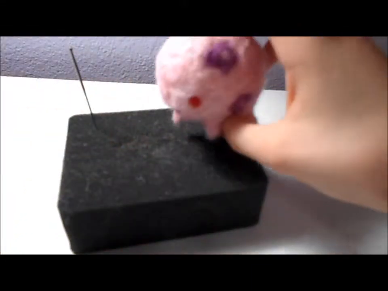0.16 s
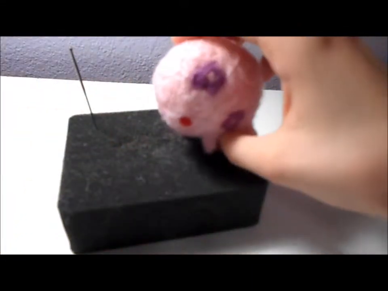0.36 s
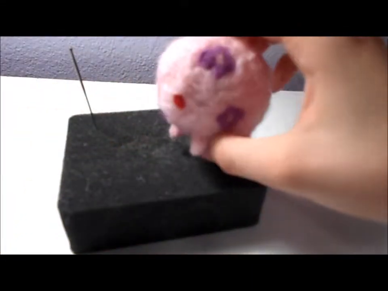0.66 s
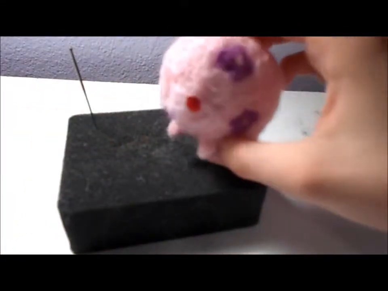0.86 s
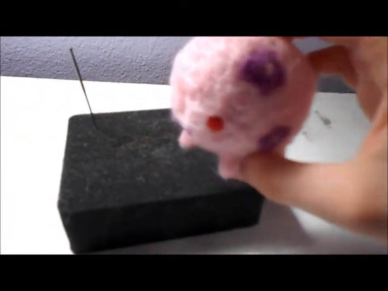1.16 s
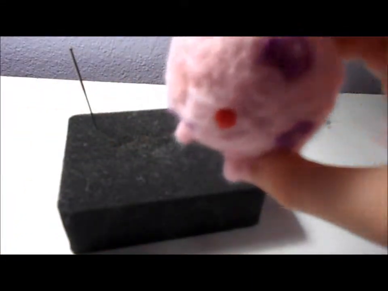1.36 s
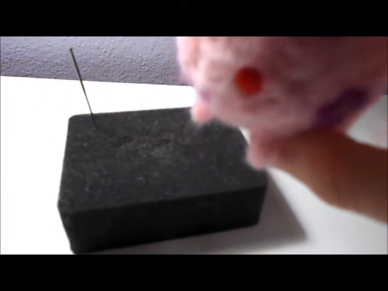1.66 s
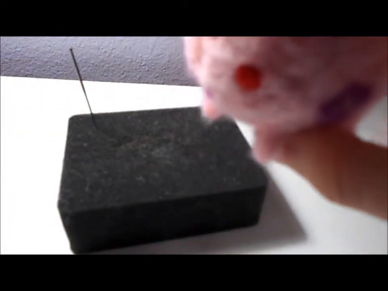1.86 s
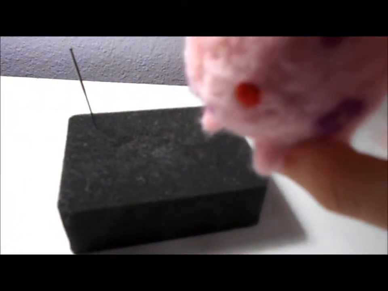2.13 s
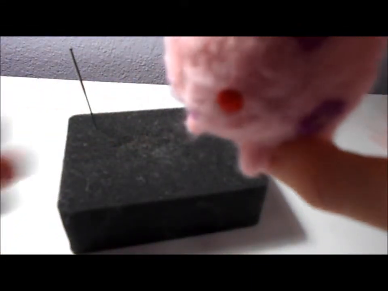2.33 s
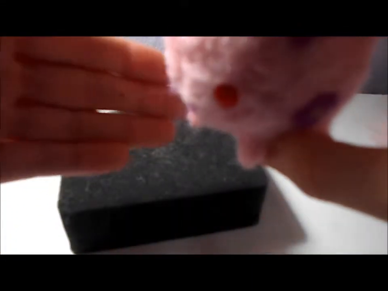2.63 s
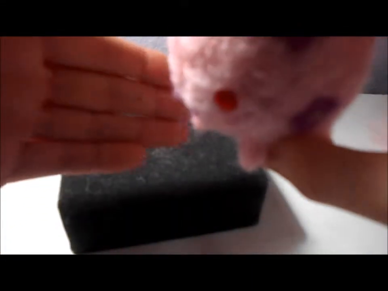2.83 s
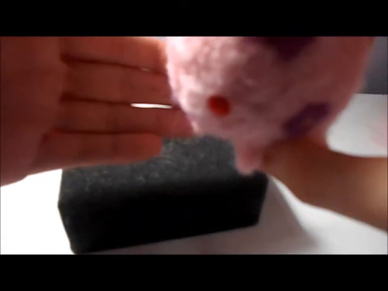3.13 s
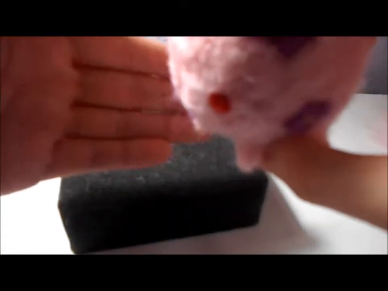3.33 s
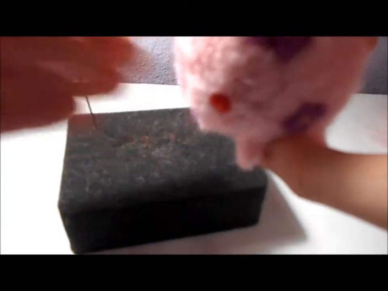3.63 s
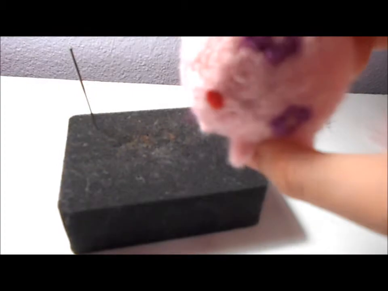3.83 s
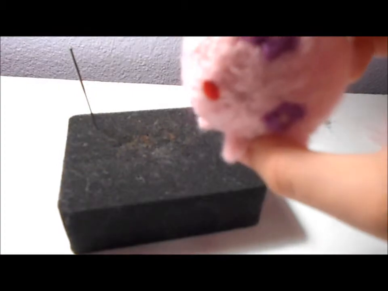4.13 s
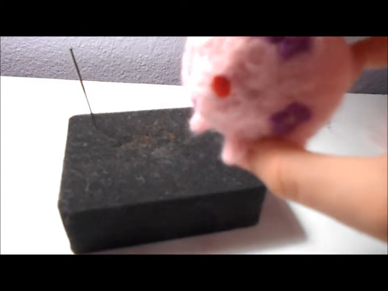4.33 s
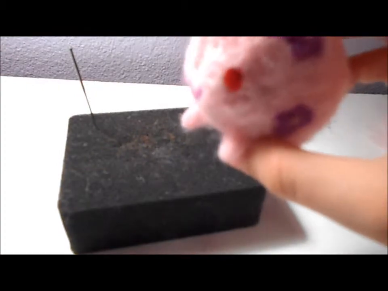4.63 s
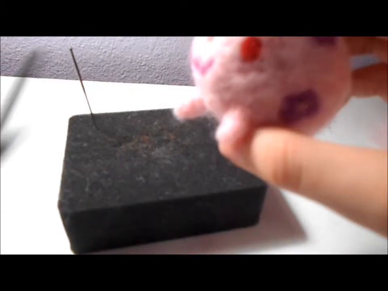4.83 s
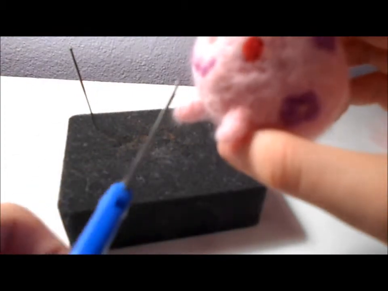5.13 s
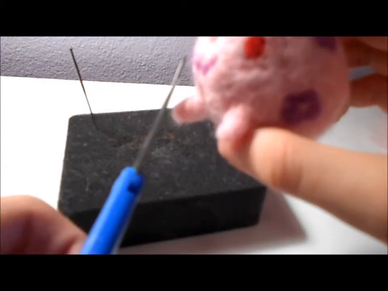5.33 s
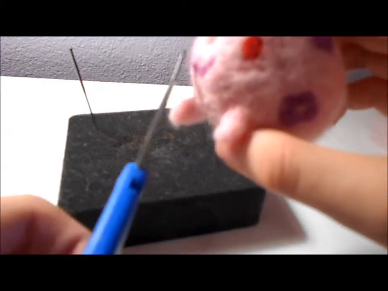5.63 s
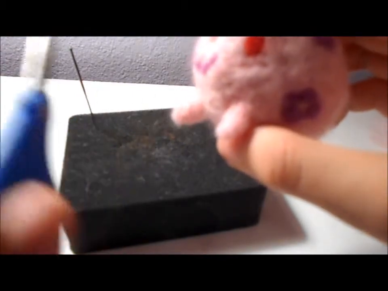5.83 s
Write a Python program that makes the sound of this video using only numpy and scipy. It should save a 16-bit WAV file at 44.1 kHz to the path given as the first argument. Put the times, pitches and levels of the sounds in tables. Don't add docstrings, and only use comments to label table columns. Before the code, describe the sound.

Small metal scissors bump and scrape on a hollow desk, drop with a sharp clatter, get picked up and snip twice over steady hiss.

```python
import sys
import numpy as np
from scipy import signal
from scipy.fft import rfft, irfft, next_fast_len
from scipy.io import wavfile
from scipy.ndimage import uniform_filter1d

SR = 44100
rng = np.random.default_rng(int(sys.argv[2]) if len(sys.argv) > 2 else 0)


def store_pcm(level_fs):
    pcm = np.round(np.clip(level_fs, -1, 1) * 32767).astype(np.int16)
    wavfile.write(sys.argv[1], SR, np.atleast_2d(pcm).T)


def volts(x):
    e = np.asarray(x, float) / 20
    return 10 ** e


N = 263718
BOARD_LOW_HZ = 178
WIDTH_TO_T60 = np.log(1000) / np.pi


def unit(x):
    return x / np.sqrt(np.mean(x ** 2))


def decay(t, t60):
    return np.exp(-np.log(1000) * t / t60)


def ring(hz, db, t60, size=8192):
    t = np.arange(size) / SR
    hz, db, t60 = (np.asarray(v)[:, None] for v in (hz, db, t60))
    return np.sum(volts(db) * decay(t, np.maximum(t60, .001)) * np.sin(2 * np.pi * hz * t), axis=0)


def conv(x, h):
    return signal.fftconvolve(x, h)[:len(x)]


def band(x, lo_hz, hi_hz, order=2):
    return signal.sosfilt(signal.butter(order, [lo_hz, hi_hz], "band", fs=SR, output="sos"), x)


def above(x, hz):
    return signal.sosfilt(signal.butter(4, hz, "high", fs=SR, output="sos"), x)


def gains(rows, roundness):
    out, t = np.zeros(N), np.arange(N) / SR
    for peak_s, rise_s, fall_s, db in rows:
        away = np.where(t < peak_s, (peak_s - t) / rise_s, (t - peak_s) / fall_s)
        stroke = volts(db - 20 * np.minimum(away, 3) ** roundness)
        out = np.maximum(out, stroke)
    return out


def grit(rate_hz, spread_db):
    hit = rng.random(N) < rate_hz / SR
    sign = rng.choice([-1., 1.], N)
    return hit * sign * volts(spread_db * rng.exponential(size=N))


def add(out, s, sound):
    i = int(s * SR)
    out[i:i + len(sound)] += sound[:N - i]


# f/Hz, t60/s, level touched at near edge/dB, level touched mid-board/dB
TABLE = [(190, 0.23, -13, -10.5), (316, 0.068, -7, -13), (338, 0.065, -15, 0.5), (391.7, 0.089, -17, -0.5),
         (461.6, 0.061, -11, -3.5), (545.6, 0.107, -7.5, -3.5), (670, 0.082, -12, -8.5),
         (958, 0.036, -6, -6), (1218, 0.1452, -21, -18.5), (1700, .04, -20, -14.5)]


def board(place, scatter_db=0.):
    hz, t60, *db = np.transpose(TABLE)
    return above(ring(hz, db[place] + scatter_db, t60), BOARD_LOW_HZ)


# f/Hz, level/dB, t60/s
SCISSORS = [(1090, -37, 0.05), (1270, 5.5, 0.073), (1653, -2.5, 1.5), (1980, -3, 0.041), (2309, -20, 0.04),
            (2530, -30, 0.065), (3228, -34, 0.041), (3480, -8, 0.023), (3817, -7.5, 0.11),
            (4330, -13, 0.043), (4700, -7, 0.019), (5230, -4.5, 0.034), (6040, -9.5, 0.018),
            (6400, -1, 0.039)]


def knock(place, rattle_s, peak_db, board_db, contact_hz, thud_hz):
    scatter_db, damped_t60_s, low_hz = 2.5, 0.0067, 600
    t = np.arange(1024) / SR
    chatter = (rng.random(len(t)) < .3) * rng.standard_normal(len(t))
    chatter[0] = 1.6
    chatter *= np.exp(-(t / rattle_s) ** 2)

    force = band(np.pad(chatter, (0, 7168)), contact_hz / 1.61, contact_hz * 1.17, order=1)
    force = above(force, low_hz)

    hz, db, t60 = np.transpose(SCISSORS)
    db = db + scatter_db * rng.standard_normal(len(hz))
    steel = conv(force, ring(hz, db, np.minimum(t60, damped_t60_s)))
    low_pass = signal.butter(2, min(2.3 * contact_hz, 9000), fs=SR)
    top = signal.lfilter(*low_pass, unit(steel) + 1.2 * unit(force))

    thud = above(ring([thud_hz], [4], [.045]), BOARD_LOW_HZ)
    wood = thud + board(place, scatter_db * rng.standard_normal(len(TABLE)))
    wood = conv(wood, np.hanning(int(0.0011 * SR)))
    top = volts(peak_db + 2.5) * top / np.abs(top).max()
    return top + volts(board_db + 8) * wood / np.abs(wood).max()


# t/s, scissors peak/dB, board level/dB, contact f/Hz, thud f/Hz
KNOCKS_EDGE = [
    (0.1328, -31.5, -44, 1700, 332),
    (0.157, -39.5, -44, 1210, 300),
    (0.2625, -23.5, -34, 1990, 515),
    (0.2672, -33.5, -36, 1310, 638),
    (0.987, -59, -53, 890, 380),
    (4.2625, -33, -35.5, 2040, 522),
]
KNOCKS_MID = [
    (1.973, -64, -47, 900, 520),
    (1.983, -77, -42.5, 883, 315.3),
    (4.1725, -53, -48, 1500, 325),
    (4.4025, -68, -41.5, 900, 388),
    (4.4092, -31, -33.5, 1740, 360),
    (4.4232, -42, -32.5, 900, 345),
    (4.4347, -30.5, -28.5, 2060, 490),
    (4.552, -22, -33.5, 2960, 296),
]
DROP = [
    (1.9954, -8.5, -32.5, 4200, 1110),
    (1.997, -9.5, -26, 3600, 440),
    (2.0009, -12, -24, 3200, 670),
    (2.0030, -11, -28.5, 4000, 425),
    (2.0094, -25.5, -25.5, 3485, 190),
]


def knocks():
    out = np.zeros(N)
    # place, chatter/s, blows
    groups = (0, 0.0058, KNOCKS_EDGE), (1, 0.0065, KNOCKS_MID), (1, .0028, DROP)
    for place, rattle_s, rows in groups:
        for s, *blow in rows:
            add(out, s, knock(place, rattle_s, *blow))
    return out


# peak t/s, rise/s, fall/s, board level/dB, scuff level/dB
SLIDES_EDGE = [(.022, 0.042, 0.054, -79, -60), (.19, 0.062, 0.062, -49.5, -60.5),
               (.29, 0.028, 0.053, -48.5, -61.5), (.357, 0.043, 0.064, -50.5, -61.5),
               (.47, 0.12, 0.044, -58.5, -63), (.548, 0.064, 0.055, -53.5, -61),
               (.856, 0.092, 0.059, -59.5, -65.5), (1.292, .1, 0.12, -66.5, -69.5),
               (1.698, 0.046, 0.041, -57, -67)]
SLIDES_MID = [(.66, 0.048, 0.06, -57, -61), (0.697, 0.048, 0.034, -54, -60.5), (.77, .1, 0.11, -62.5, -70),
              (1.975, 0.045, 0.018, -52, -76), (2.154, 0.049, .04, -55.5, -83),
              (4.18, 0.053, 0.094, -53.5, -69.5), (4.377, 0.03, .04, -50, -74),
              (4.457, 0.023, 0.049, -43, -70), (4.494, 0.034, 0.046, -32.5, -54.5),
              (4.535, 0.023, .03, -36, -57), (4.59, 0.04, 0.058, -53.5, -61)]


def slides():
    out = 0
    for place, rows in enumerate((SLIDES_EDGE, SLIDES_MID)):
        slips = unit(grit(4000, spread_db=0.0))
        response = board(place)
        response = response / np.sqrt(np.sum(response ** 2))
        push = gains([row[:4] for row in rows], roundness=1.42)
        out = out + conv(slips * push, response)
        scuff = unit(band(grit(3500, spread_db=2.5), 1500, 5000, order=1))
        out = out + scuff * gains([row[:3] + row[4:] for row in rows], roundness=1.7)
    return out


# peak t/s, rise/s, fall/s, level/dB, pitch f/Hz
JUDDER = [(0.144, 0.016, 0.025, -47.5, 279), (.197, .02, .03, -44, 298), (0.232, 0.051, .03, -44, 296),
          (.303, 0.021, .03, -40, 281), (0.321, 0.035, .02, -45.5, 281), (.362, 0.037, 0.055, -41.5, 297),
          (.39, .04, 0.074, -48.5, 292), (.545, 0.027, 0.051, -52.5, 286), (.866, 0.058, 0.06, -60.5, 286),
          (1.316, 0.021, 0.024, -60.5, 291), (1.707, 0.02, 0.023, -49, 293)]


def judder():
    rows = np.array(JUDDER)
    hz = np.interp(np.arange(N) / SR, rows[:, 0], rows[:, -1])
    uneven = unit(uniform_filter1d(rng.standard_normal(N), size=300))
    phase = 2 * np.pi * np.cumsum(hz * (1 + 0.016 * uneven)) / SR
    hum = np.sin(phase) * volts(2.1 * uneven)
    return np.sqrt(2) * hum * gains(rows[:, :-1], roundness=1.8)


# f/Hz, width/Hz, level/dB
BLADES = [(1350, 310, -15.5), (2860, 860, -13), (4700, 640, 1), (5760, 780, 3.5), (7100, 1060, 9),
          (8800, 500, 2), (9320, 340, -2)]
# peak t/s, rise/s, fall/s, shear level/dB, low share/dB
SNIPS = [
    (4.724, 0.022, 0.022, -56.5, -4.5),
    (4.8253, 0.0023, .012, -51, -1.5),
    (4.842, 0.017, 0.015, -35, -22.5),
    (5.69, .03, .02, -67, 4),
    (5.712, 0.026, 0.022, -56.5, 3.5),
    (5.727, 0.015, 0.019, -48.5, -2),
]
# t/s, peak/dB, ring f/Hz, ring width/Hz, thump level/dB
STOPS = [(4.8314, -36, 4600, 700, -76), (4.8356, -28, 7100, 500, -75), (4.839, -22, 9020, 600, -61),
         (4.8446, -27, 4700, 900, -62), (4.847, -21, 8800, 499.6, -53), (5.724, -45, 9320, 3000, -80.5),
         (5.7284, -30, 5350, 2500, -79), (5.7328, -37, 8000, 4000, -80), (5.7394, -22, 4660, 3980, -47.5),
         (5.7399, -25.5, 6340, 2500, -71), (5.7413, -31, 4550, 2500, -72)]


def stop(peak_db, ring_hz, width_hz, thump_db):
    t = np.arange(2048) / SR
    swell = np.sin(np.pi * np.clip(t * width_hz, 0, 1))
    rough = 1 + 1.23 * rng.standard_normal(len(t))
    rub = rough * np.sin(2 * np.pi * ring_hz * t) * swell
    tick = conv(rub, ring([ring_hz], [0], [WIDTH_TO_T60 / width_hz], size=2048))
    out = volts(thump_db) * ring([70], [0], [.08], size=4096)
    out[:len(tick)] += volts(peak_db) * tick / np.abs(tick).max()
    return out


def snips():
    hz, width_hz, db = np.transpose(BLADES)
    t60 = WIDTH_TO_T60 / width_hz
    fibres = above(grit(6000, spread_db=2.5), 1300)
    high = unit(conv(fibres, ring(hz[2:], db[2:], t60[2:], size=1024)))
    low = unit(conv(fibres, ring(hz[:2], db[:2], t60[:2], size=1024)))
    highs = [row[:-1] for row in SNIPS]
    lows = [(*shape, shear_db + low_db) for *shape, shear_db, low_db in SNIPS]
    out = high * gains(highs, roundness=2.0) + low * gains(lows, roundness=1.7)
    for s, *hit in STOPS:
        add(out, s, stop(*hit))
    return out


# f/Hz, t60/s
ROOM = [(300, 0.24), (1000, .15), (2000, 0.2), (3500, 0.17), (5200, 0.15), (7500, 0.14)]


def room(x):
    t = np.arange(16384) / SR
    tail = np.zeros(len(t))
    for hz, t60 in ROOM:
        noise = band(rng.standard_normal(len(t)), hz / 1.9, min(hz * 1.12, 15000))
        tail += noise * decay(t, t60)
    tail *= np.clip(t / 0.0012, 0, 1)
    return conv(x, volts(-17) * tail / np.sqrt(np.sum(tail ** 2)))


# f/Hz, level per Hz/dB
HISS = [(12, -40), (20, 0.5), (61, -5.5), (221, -11.5), (870, -19), (6130, -26), (9850, -28), (11000, -33)]


def hiss():
    hz, db = np.transpose(HISS)
    size = next_fast_len(N)
    bin_hz = np.fft.rfftfreq(size, 1 / SR)
    colour = volts(np.interp(np.log(bin_hz + 1), np.log(hz), db))
    noise = irfft(rfft(rng.standard_normal(size)) * colour, size)[:N]
    return volts(-63.5) * unit(noise)


# f/Hz, width/Hz, level/dB
WHINE = [(6175, 342, -84), (355, 30, -78.5)]


def whine():
    out = np.zeros(N)
    for hz, width_hz, db in WHINE:
        noise = band(rng.standard_normal(N), hz - width_hz / 2, hz + width_hz / 2)
        out += volts(db) * unit(noise)
    return out


def scene():
    table = slides() + judder() + knocks()
    blades = snips()
    tail = room(table + volts(-6.5) * blades)
    return (table + blades + tail + hiss() + whine())[None]


def roll_off(x):
    return signal.sosfilt(signal.butter(12, 11100, fs=SR, output="sos"), x)


def record(dry):
    top_hz, clip_at = 10230, .46
    x = signal.sosfilt(signal.cheby1(8, .5, top_hz, fs=SR, output="sos"), dry)
    mix = clip_at * np.tanh(x / clip_at)
    return roll_off(mix)


dry = scene()
out = record(dry)
store_pcm(out)
```